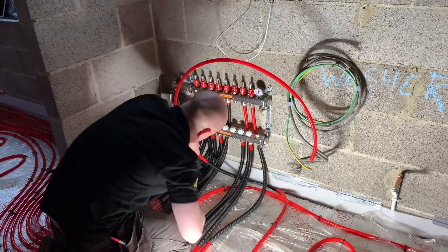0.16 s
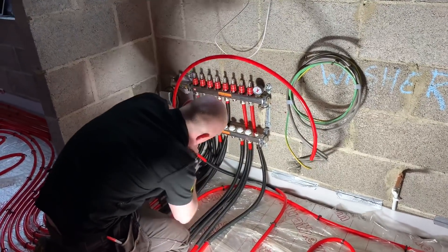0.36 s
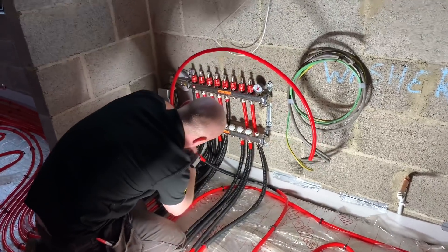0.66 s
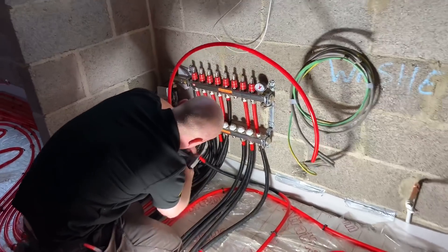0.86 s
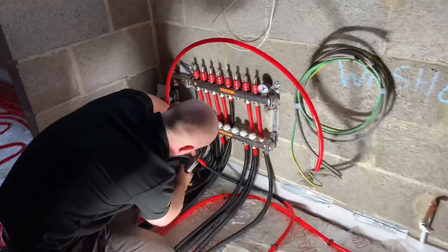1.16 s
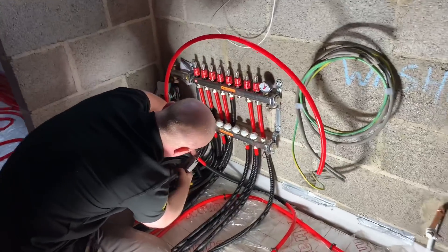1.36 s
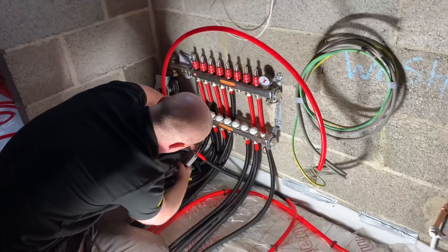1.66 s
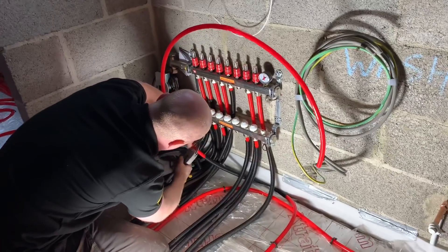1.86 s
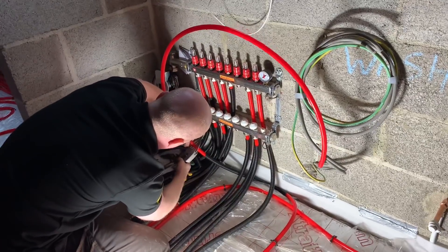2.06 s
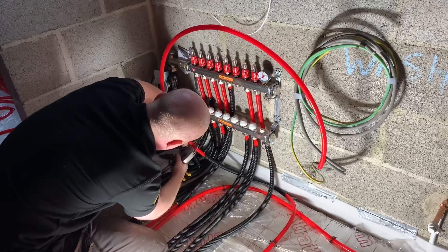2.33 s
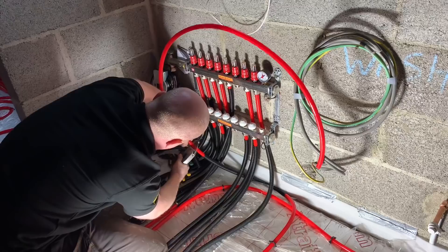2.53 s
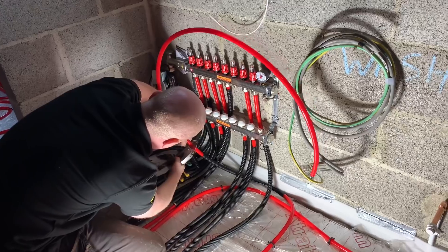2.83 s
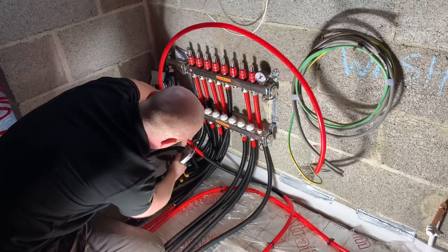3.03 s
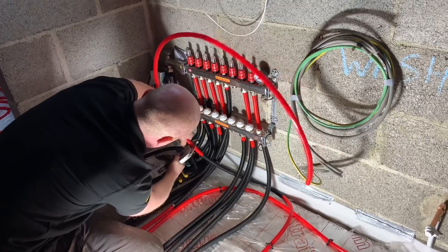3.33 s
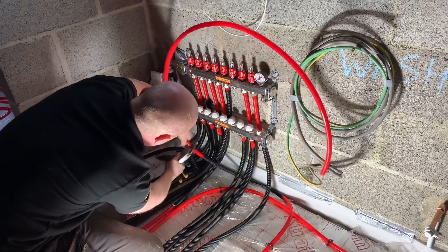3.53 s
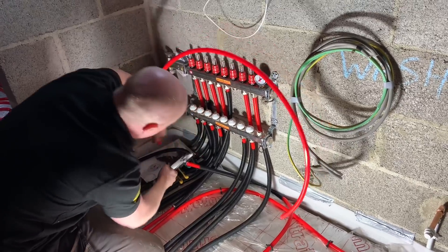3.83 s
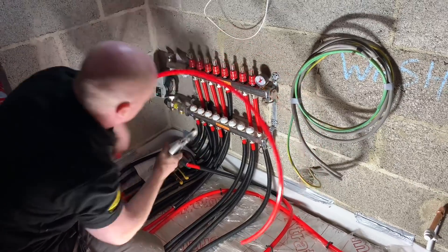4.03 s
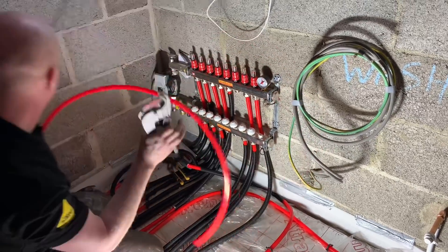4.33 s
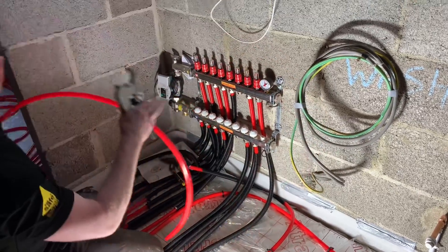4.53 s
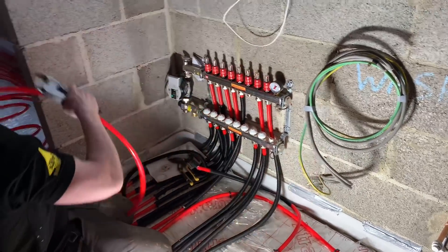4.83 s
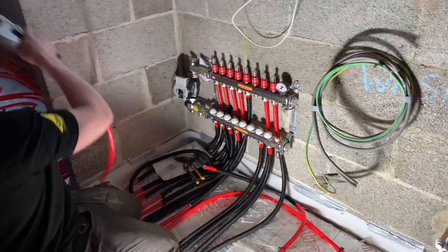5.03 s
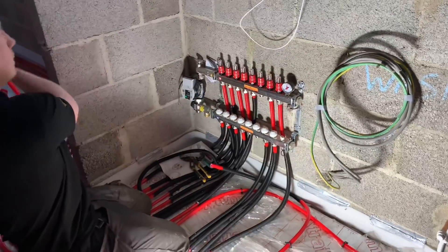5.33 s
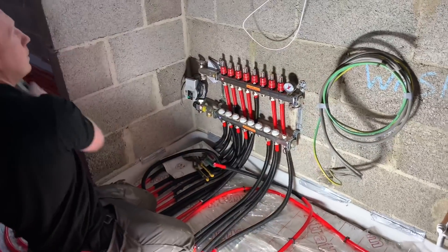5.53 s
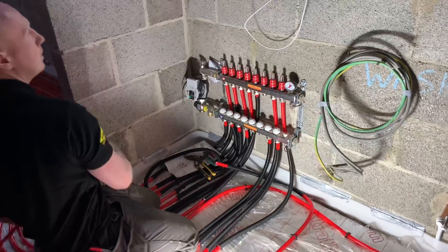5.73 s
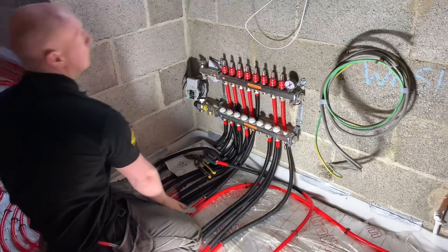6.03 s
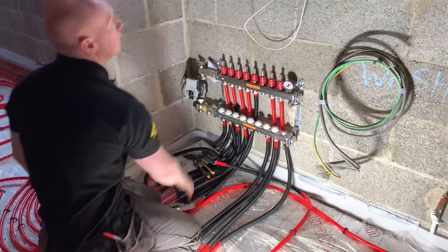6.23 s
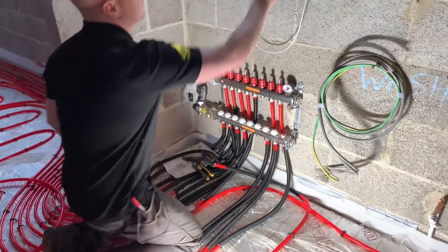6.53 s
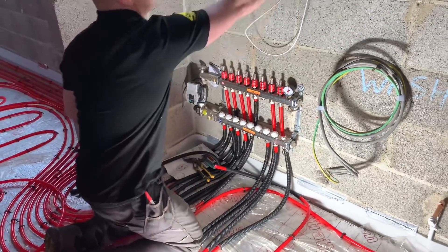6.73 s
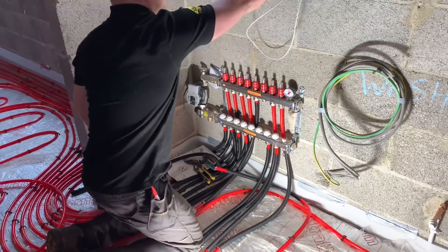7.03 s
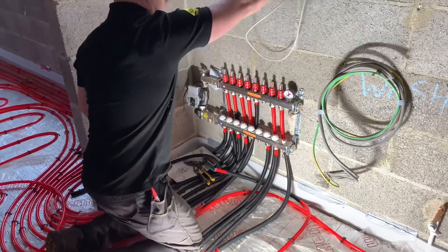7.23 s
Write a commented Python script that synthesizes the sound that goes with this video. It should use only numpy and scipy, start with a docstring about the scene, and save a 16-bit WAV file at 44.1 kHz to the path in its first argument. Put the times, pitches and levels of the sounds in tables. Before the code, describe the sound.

A ratchet cutter clicks and creaks through plastic heating pipe, which snaps and slaps; then heavy floor thumps, tool clatter and clothes rustling in a bare room.

```python
"""Bare block-walled room: a ratchet cutter bites through plastic heating pipe.
Cutter, pipe, floor and bumps: shaped contact noise plus decaying modes. Squeaks and creaks: harmonics of
stick-slip cycles. Crunches: noise bursts in wall resonances. Slaps and landings add booms of decaying sines.
The pipe snaps off and slaps about, the cutter clatters down, a knee thumps on the insulated floor.
Clothes and pipe rustle as filtered noise over the quiet noise of the empty building."""
import sys
import numpy as np
from scipy import signal
from scipy.fft import rfft, irfft, next_fast_len
from scipy.io import wavfile
from scipy.ndimage import uniform_filter1d

SR = 44100
rng = np.random.default_rng(int(sys.argv[2]) if len(sys.argv) > 2 else 0)


def unload_audio(sound):
    """Save the sound as a 16-bit wav file, at the path given as the first command line argument."""
    columns = np.transpose(np.atleast_2d(sound))
    # keep every value between -1 and 1, then stretch to whole-number steps
    steps = np.round(np.clip(columns, -1, 1) * 32767)
    wavfile.write(sys.argv[1], SR, steps.astype(np.int16))


N = 325899
RING_S = np.arange(next_fast_len(int(0.46 * SR))) / SR  # time axis of one event
BASS_HZ, TREBLE_HZ, TOP_HZ = 450, 6000, 15900  # band edges of a blow; TOP_HZ also ends the whole sound

# Event levels are ahead of layer gain and microphone.
# cutter squeezes, a creak ending in a click; the first meets no load, the last breaks through the pipe:
# click t/s, click level/dB, treble re click/dB, creak length/s, creak level/dB, creak start f/Hz, roughness 0-1
STROKES = [(0.11, -41, 11.5, .012, -59, 850, 0.5), (1.257, -29, 17, 0.052, -46.5, 944, 0.5),
           (1.606, -31.5, 7, 0.057, -37.5, 1860, 0.09), (2.015, -42.5, 5.5, 0.078, -49.5, 845, 0.47),
           (2.705, -35.5, 9, 0.084, -44.5, 670, 0.9), (3.111, -24.5, 16.5, .069, -41.5, 817, 0.8),
           (3.394, -25.5, 0, 0.017, -53, 900, 0.66), (3.454, -21, 4, 0.012, -33, 970, 0.75)]
PAWL_BASS_DB = -15  # re click
CREAK_RISE = 0.078  # share by which pitch climbs as the load builds
# handles and latch knocking as the grip eases: t/s, level/dB
HANDLE_CLICKS = [(1.378, -33.5), (1.667, -34), (2.105, -37), (2.161, -36), (2.756, -33), (2.921, -41.5),
                 (3.598, -33.5), (6.697, -47)]
# lighter clicks sound thinner: treble equals level at EVEN, gains THINNING dB per dB below it
HANDLE_BASS_DB, HANDLE_EVEN_DB, HANDLE_THINNING = -7.5, -37.5, 0.24
# cutter striking the floor and bouncing: t/s, level/dB, bass re level/dB, treble re level/dB
CUTTER_DROPS = [(6.007, -19, -6.5, -6), (6.113, -26, -3, -25)]
# cutter resonances: f/Hz, level/dB, t60/s
CUTTER_MODES = [(3143, -1, 0.03), (3492, 0, 0.072), (3750, 4, 0.06), (5690, -8, .08), (6218, -3, 0.06),
                (9620, 4, 0.13), (9790, 0, 0.08), (12800, -4, .06), (14290, -2, 0.06)]
# cutter contact noise: f/Hz, level/dB
CUTTER_CRACK = [(60, -6.5), (170, 1.5), (450, -5), (1200, -2), (3300, 2), (4800, -2), (7500, -8),
                (8600, 4.5), (9600, 8), (11000, -3.5), (14300, 2.5), (16000, -11.5)]

# plastic sticking and slipping: t/s, length/s, start f/Hz, end f/Hz, level/dB, roughness 0-1
SQUEAKS = [(1.05, 0.038, 3650, 2950, -47, 0.18), (1.563, .036, 3000, 3130, -38.5, .1),
           (3.655, 0.044, 1890, 2020, -35.5, 0.1), (6.86, 0.052, 6470, 6430, -46, 0),
           (6.995, 0.05, 5650, 5550, -51, .03)]
# pipe wall weighting of squeak harmonics: f/Hz, level/dB
SQUEAK_BODY = [(600, -30), (1100, -22), (1900, -2), (3000, 0), (3900, 1), (4700, -14), (6000, -17),
               (16000, -34)]
# pipe wall crunching under blade and grip: peak t/s, swell/s, level/dB, resonance f/Hz
CRUNCHES = [(1.264, 0.0056, -29.5, 3800), (1.61, .006, -34, 3200), (2.016, .006, -38, 3290),
            (2.11, 0.0084, -41.5, 3500), (2.501, .008, -47, 3970), (2.668, 0.022, -44.5, 1950),
            (2.709, 0.0098, -31.5, 3130), (3.059, 0.013, -42, 2520)]
# pipe wall resonances: multiple of the main one, relative width, level/dB
WALL_RESONANCES = [(1, .09, 0), (1.15, .1, -5), (1.65, .25, -12)]
CRUNCH_RELEASE_S = 0.0082

# loose pipe knocking on hard things: t/s, level/dB, contact hardness 0-1
PIPE_KNOCKS = [(2.85, -48.5, 0.05), (4.652, -40, 0.82), (4.692, -33.5, 0.76), (5.208, -50, 0.16),
               (7.289, -49, 0.59)]
# softest and hardest contact: bass re level/dB, treble re level/dB
SOFT_TONE, HARD_TONE = (5.5, -30), (-53, 0.5)
# pipe whipping free and slapping down, each with a boom and one rebound:
# t/s, level/dB, bass re level/dB, boom level/dB, boom f/Hz, boom loss on rebound/dB
PIPE_SLAPS = [(3.455, -15.5, -12, -17, 137.7, 10.5), (4.176, -29, 1, -13.5, 344.6, 5)]
SLAP_SOFTENING = 2.4  # dB lost by the rebound's crack per dB lost by its boom
SLAP_TREBLE_DB, SLAP_REBOUND_BASS_DB, SLAP_REBOUND_S = -9, 6.5, 0.081  # dB re the blow concerned
# pipe resonances: f/Hz, level/dB, t60/s
PIPE_MODES = [(317, -8, 0.041), (468.3, -8, 0.078), (875, -10.5, 0.083), (1047, -1.5, 0.037),
              (1310, 0, 0.028), (1884, 8.5, 0.028), (2324, -1.5, 0.03), (4160, -7.5, 0.066)]
# pipe contact noise: f/Hz, level/dB
PIPE_CRACK = [(50, -10), (170, 3), (330, 3), (650, -7), (1100, -3), (1900, 1), (5000, -7), (16000, -11)]

# knees, tool and fittings landing on the floor: touch, full weight with boom, rebound:
# t/s, level/dB, bass re level/dB, treble re level/dB, touch level/dB, boom level/dB, rebound delay/s
LANDINGS = [(5.732, -18, -9, -26, -28, -31.5, .029), (5.990, -17.5, -7.5, -15.5, -26.5, -9.5, .059),
            (6.145, -23.5, -9, -6, -27, -11, .029)]
TOUCH_LEAD_S, TOUCH_BASS_DB, TOUCH_TREBLE_DB = 0.035, -3, -22  # dB re touch
REBOUND_DB, REBOUND_TREBLE_DB, REBOUND_BOOM_DB = -7, -19, -4.5  # re landing, re rebound, re first boom
# resonances of what lands: f/Hz, level/dB, t60/s
CLATTER_MODES = [(322, 5, 0.213), (462, 3.5, 0.39), (593, 15.5, 0.064), (683, 7, 0.28), (1104, 19.5, 0.04),
                 (1716, 6, 0.1), (2267, 5, 0.073)]
# landing contact noise: f/Hz, level/dB
CLATTER_CRACK = [(60, -16), (180, -30), (350, 0), (700, 0), (1500, -2), (3500, -5), (5500, -21),
                 (10000, -5), (16000, -4.5)]
# boom resonances: multiple of boom pitch, level/dB, t60 at 170 Hz pitch/s
BOOM_MODES = [(.68, -23.5, 0.24), (1, -9, 0.17), (.97, 2, 0.05), (1.3, -5, 0.041)]
BOOM_LAG_S = 0.0032  # a boom builds just after its blow
FLOOR_HZ = 167.2  # boom of the insulation panels
# whole floor, level ahead of the high-pass for a boom at FLOOR_HZ
RUMBLE_HZ, RUMBLE_DB, RUMBLE_T60_S = 61, -19.5, 0.67

# dull bumps of hands, boots and pipe on the floor: t/s, level/dB, bass re level/dB
BUMPS = [(0.391, -59, 5), (0.69, -53, 8), (0.87, -53.5, 5.5), (1.094, -45.5, 1.5), (1.421, -37.5, 2),
         (2.496, -45, -3.5), (3.25, -46, 3), (5.038, -54, 0.5), (5.078, -60.5, 11.5), (6.623, -34.5, 1),
         (6.651, -42.5, 5), (6.82, -52, -14.5)]
BUMP_TREBLE_DB = -25.5  # re level
# bump resonances: f/Hz, level/dB, t60/s
BUMP_MODES = [(158, 0.5, 0.1), (330, -5.5, 0.094), (523, -3.5, .05), (1000, -5.5, 0.052)]
# bump contact noise: f/Hz, level/dB
BUMP_CRACK = [(60, -1.5), (170, 4.5), (900, -1), (1500, -4.5), (2500, -13.5), (8000, -35.5)]

# sleeves, trousers and pipe rubbing, one curve per movement: t/s, rub level/dB, hiss level/dB
RUB_AT_REST = (0, -55.5, -61.5)  # ahead of the first movement
# reaching: t/s, rub level/dB, hiss level/dB
RUB_REACHING = [(0.18, -50, -49.5), (0.328, -53, -41.5), (0.466, -62.5, -64), (0.622, -66, -72),
                (0.648, -54.5, -63), (0.684, -60.5, -53), (1.04, -60.5, -60)]
# cutting: t/s, rub level/dB, hiss level/dB
RUB_CUTTING = [(1.15, -59.5, -66.5), (1.28, -53, -37), (1.46, -43.5, -40), (1.54, -52, -52.5),
               (1.73, -108, -72), (1.98, -51, -80), (2.12, -54, -67), (2.28, -93.5, -68.5),
               (2.54, -63.5, -78), (2.74, -51.5, -55.5), (3.35, -64, -61)]
# turning: t/s, rub level/dB, hiss level/dB
RUB_TURNING = [(3.75, -60.5, -79), (4.058, -58, -67), (4.7, -59, -52)]
# rising: t/s, rub level/dB, hiss level/dB
RUB_RISING = [(4.8, -59.5, -53.5), (4.884, -51, -57), (4.976, -66, -92), (5.052, -61, -74),
              (5.079, -52.5, -58), (5.574, -50.5, -62.5), (5.64, -59.5, -70)]
# kneeling: t/s, rub level/dB, hiss level/dB
RUB_KNEELING = [(5.68, -59.5, -63), (5.774, -30.5, -46.5), (5.888, -40.5, -57), (5.936, -46.5, -62),
                (6.018, -21, -56), (6.1, -35, -50), (6.146, -25, -41), (6.298, -42, -61), (6.418, -48, -72),
                (6.642, -63.5, -65.5), (6.888, -50, -52.5), (7.39, -65, -62)]
RUB_FLICKER_DB = 2
# rustle noise colour: f/Hz, level/dB
RUSTLE_COLOUR = [(60, 13), (170, 4), (500, 0.5), (1000, 5.5), (2800, -3), (5000, -17.5), (15000, -25)]

# empty building, noise colour: f/Hz, level per Hz/dB
AMBIENCE = [(20, -7.5), (60, 5), (100, -5.5), (320, -7), (600, -18.5), (1200, -26.5), (3000, -21.5),
            (5000, -36), (10000, -39), (16000, -39)]
AMBIENCE_DB = -55.5
# room decay: f/Hz, t60/s
ROOM_T60 = [(60, 0.56), (160, 0.42), (420, 0.23), (1100, 0.27), (3000, 0.21), (8000, 0.16), (15000, 0.094)]
# likeness of left and right: f/Hz, correlation
LIKENESS = [(30, .2), (90, .88), (180, .8), (350, .3), (700, -.3), (1400, -.2), (2800, .05), (4500, -.2),
            (6500, .4), (9600, .6), (14000, .2)]
# microphone balance: f/Hz, left minus right/dB
MIC_BALANCE = [(80, -3.5), (170, -1), (330, -1), (650, 4.5), (1300, 2), (2600, 0.5), (5500, -1.5),
               (10000, 0.5)]
# microphone response: f/Hz, level/dB
MIC_COLOUR = [(10500, 1.5), (11300, -10.5), (11750, -25.5), (12300, 2.5), (13000, 1)]


def cutter():
    """Pawl ends every squeeze, handles knock in between, the tool drops: metal modes and contact noise."""
    pawl = [(t_s, db, PAWL_BASS_DB, treble_db) for t_s, db, treble_db, *_ in STROKES]
    handles = [(t_s, db, HANDLE_BASS_DB, HANDLE_THINNING * (HANDLE_EVEN_DB - db))
               for t_s, db in HANDLE_CLICKS]
    return blows(pawl + CUTTER_DROPS + handles, CUTTER_MODES, CUTTER_CRACK,
                 contact_s=0.0029, ring_db=-11.5, wet_db=1.2, bass_from_hz=180,
                 loud_db=-22.0, force_slope=0.88, rattle_db=-28.5, rattle_t60_s=0.05)


def creaks():
    """Each squeeze creaks upward until the pawl clicks; rows as in SQUEAKS."""
    return [(t_s - length_s, length_s, hz, hz * (1 + CREAK_RISE), db, rough)
            for t_s, _, _, length_s, db, hz, rough in STROKES]


def squeaks(jitter=0.24, wet_db=-4, catch_db=2.8):
    """Stick-slip cycles through pipe wall resonances; uneven slips turn a squeak into a creak."""
    dry = np.zeros(N)
    for t_s, length_s, start_hz, end_hz, db, rough in creaks() + SQUEAKS:
        u = np.linspace(0, 1, int(length_s * SR))
        wobble, grip = (unit(uniform_filter1d(rng.standard_normal(len(u)), size=size))
                        for size in (60, 200))
        pitch_hz = (start_hz + (end_hz - start_hz) * u) * (1 + jitter * rough * wobble)
        phase = 2 * np.pi * np.cumsum(pitch_hz) / SR
        harmonics = range(1, max(int(12000 / start_hz), 1) + 1)
        slips = sum(undb(at(SQUEAK_BODY, k * start_hz)) * np.sin(k * phase) for k in harmonics)
        swell = u * np.sqrt(1 - u)
        catches = undb(catch_db * (1.5 + rough) * grip)
        add(dry, t_s, undb(db) * unit(slips * swell * catches))
    return room(dry, wet_db)


def crunches(grain_db=6, wet_db=-3):
    """A burst of tiny slips swells and dies away in the resonances of the pipe wall."""
    dry = np.zeros(N)
    for t_s, swell_s, db, hz in CRUNCHES:
        u_s = RING_S - 2 * swell_s
        effort = np.where(u_s < 0, np.exp(-(u_s / swell_s) ** 2), np.exp(-np.abs(u_s) / CRUNCH_RELEASE_S))
        slips = effort * rng.standard_normal(len(RING_S)) * undb(grain_db * walk(600)[:len(RING_S)])
        wall = sum(undb(mode_db) * band(slips, hz * k * (1 - width / 2), hz * k * (1 + width / 2), order=1)
                   for k, width, mode_db in WALL_RESONANCES)
        wall = band(wall, hz / 2, hz * 2, order=2)
        # level as rms over 30 ms
        add(dry, t_s - 2 * swell_s, undb(db) * wall / np.sqrt(np.sum(wall ** 2) / (0.03 * SR)))
    return room(dry, wet_db)


def pipe():
    """Pipe wall modes: harder knocks trade bass for treble; a slap comes back once, softer and duller."""
    rows = []
    for t_s, db, hard in PIPE_KNOCKS:
        bass_db, treble_db = np.array(SOFT_TONE) * (1 - hard) + np.array(HARD_TONE) * hard
        rows.append((t_s, db, bass_db, treble_db))
    for t_s, db, bass_db, _, _, loss_db in PIPE_SLAPS:
        rebound_db = db - SLAP_SOFTENING * loss_db
        rows += [(t_s, db, bass_db, SLAP_TREBLE_DB),
                 (t_s + SLAP_REBOUND_S, rebound_db, SLAP_REBOUND_BASS_DB, SLAP_TREBLE_DB)]
    return blows(rows, PIPE_MODES, PIPE_CRACK,
                 contact_s=0.0091, ring_db=-4.0, wet_db=-3.0, bass_from_hz=110,
                 loud_db=-17.5, force_slope=0.033, rattle_db=-4.5, rattle_t60_s=0.099)


def landings():
    """Every landing touches, bears down and rebounds, each a rattling blow with its own modes."""
    rows = []
    for t_s, db, bass_db, treble_db, touch_db, _, rebound_s in LANDINGS:
        rows += [(t_s - TOUCH_LEAD_S, touch_db, TOUCH_BASS_DB, TOUCH_TREBLE_DB),
                 (t_s, db, bass_db, treble_db),
                 (t_s + rebound_s, db + REBOUND_DB, bass_db, REBOUND_TREBLE_DB)]
    return blows(rows, CLATTER_MODES, CLATTER_CRACK,
                 contact_s=0.0085, ring_db=-6.5, wet_db=-2.5, bass_from_hz=146,
                 loud_db=-12, force_slope=0.31, rattle_db=-10.0, rattle_t60_s=0.16)


def booms():
    """Slaps and landings boom, and again as they rebound; rows of t/s, level/dB, f/Hz."""
    heavy = [(t_s, db, hz, SLAP_REBOUND_S, -loss_db) for t_s, _, _, db, hz, loss_db in PIPE_SLAPS]
    heavy += [(t_s, db, FLOOR_HZ, rebound_s, REBOUND_BOOM_DB) for t_s, *_, db, rebound_s in LANDINGS]
    rows = []
    for t_s, db, hz, rebound_s, rebound_db in heavy:
        start_s = t_s + BOOM_LAG_S
        rows += [(start_s, db, hz), (start_s + rebound_s, db + rebound_db, hz)]
    return rows


def thumps(push_s=0.00083, wet_db=-10):
    """A soft push makes a panel or the pipe boom at its own pitch; the whole floor answers low booms most."""
    dry = np.zeros(N)
    for t_s, db, hz in booms():
        # higher booms die sooner
        boom = sum(undb(mode_db) * fade(t60_s * 170 / hz) * np.sin(2 * np.pi * multiple * hz * RING_S)
                   for multiple, mode_db, t60_s in BOOM_MODES)
        rumble = fade(RUMBLE_T60_S) * np.sin(2 * np.pi * RUMBLE_HZ * RING_S)
        boom += undb(RUMBLE_DB) * (FLOOR_HZ / hz) ** 2 * rumble
        add(dry, t_s, undb(db) * boom * (1 - np.exp(-RING_S / push_s)))
    return room(band(dry, 68, 2200, order=3), wet_db)


def bumps():
    """Hands, boots and pipe on the floor: short dull contacts with low modes."""
    return blows([(*row, BUMP_TREBLE_DB) for row in BUMPS], BUMP_MODES, BUMP_CRACK,
                 contact_s=0.0018, ring_db=-4, wet_db=-3.5, bass_from_hz=85,
                 loud_db=-32, force_slope=0.05, rattle_db=-18.5, rattle_t60_s=0.08)


def rustle(rub_gain_db=1, hiss_gain_db=-1.0, grain_db=2, shuffle_db=-3):
    """Rubbing swells and fades as noise with a fast grain of small catches, cloth hiss on top."""
    curve = [RUB_AT_REST, *RUB_REACHING, *RUB_CUTTING, *RUB_TURNING, *RUB_RISING, *RUB_KNEELING]
    point_s, rub_db, hiss_db = np.transpose(curve)
    t_s = np.arange(N) / SR
    rub = undb(np.interp(t_s, point_s, rub_db) + rub_gain_db)
    hiss = undb(np.interp(t_s, point_s, hiss_db) + hiss_gain_db)
    flicker = undb(grain_db * walk(350) + RUB_FLICKER_DB * walk(25))
    noise = colour(diffuse(N), RUSTLE_COLOUR) * flicker
    shuffle = undb(shuffle_db + 5.3 * walk(22)) * unit(band(noise, 110, 630))
    return rub * (shuffle + unit(band(noise, 430, 4050))) + hiss * unit(band(noise, 4000, TOP_HZ))


def ambience():
    """Quiet rumble and hiss of the empty building: coloured noise at a slowly drifting level."""
    return unit(colour(diffuse(N), AMBIENCE)) * undb(AMBIENCE_DB + 0.46 * walk(3))


def blows(events, modes, crack, contact_s, ring_db, wet_db, bass_from_hz, loud_db, force_slope,
          rattle_db, rattle_t60_s):
    """Each blow chatters for a few ms and rings the modes; its weight and hardness set bass and treble."""
    out, attack = np.zeros((2, N)), int(0.03 * SR)
    for t_s, db, bass_db, treble_db in events:
        # a harder blow chatters for longer and rings more
        force = undb(force_slope * (db - loud_db))
        u = RING_S / (contact_s * force)
        # loose parts rattle on in small uneven bounces
        bounces = unit(uniform_filter1d(rng.exponential(size=len(RING_S)) ** 6, size=70))
        push = np.sqrt(u) * np.exp(-u ** 2) + undb(rattle_db) * bounces * fade(rattle_t60_s)
        contact = colour(rng.standard_normal(len(RING_S)), crack) * push
        # mode levels and pitches vary a little at random from blow to blow
        ring = 0
        for hz, mode_db, t60_s in modes:
            gain = undb(mode_db + 2 * rng.normal())
            mode_hz = hz * (1 + 0.0052 * rng.normal())
            ring = ring + gain * fade(t60_s) * np.sin(2 * np.pi * mode_hz * RING_S) * rng.choice([-1, 1])
        sound = room(unit(contact) + force * undb(ring_db) * unit(ring), wet_db)
        bands = ((bass_from_hz, BASS_HZ, bass_db), (BASS_HZ, TREBLE_HZ, 0), (TREBLE_HZ, TOP_HZ, treble_db))
        for lo_hz, hi_hz, tone_db in bands:
            part = band(sound, lo_hz, hi_hz)
            # level as rms over the attack
            add(out, t_s, part * undb(db + tone_db) / np.sqrt(np.mean(part[:, :attack] ** 2)))
    return out


def room(x, wet_db, near_t60_s=0.0017):
    """Direct sound with the nearest reflections, then a diffuse tail in which the lows stay longest."""
    near = diffuse(len(RING_S)) * fade(near_t60_s)
    near = band(near, 440, 30000, order=1) / np.sqrt(np.sum(near ** 2) / 2)
    impulse = 1. * (RING_S == 0)
    near += band(impulse, 22, 480, order=1)
    noise = diffuse(len(RING_S))
    spectrum, noise_hz = rfft(noise), bins(noise)
    centres_hz = [hz for hz, _ in ROOM_T60]
    tail = 0
    for share, (_, t60_s) in zip(np.eye(len(centres_hz)), ROOM_T60):
        weight = at(list(zip(centres_hz, share)), noise_hz)
        tail = tail + irfft(spectrum * weight, len(RING_S)) * fade(t60_s)
    tail *= 1 - np.exp(-RING_S / 0.0022)
    response = near + undb(wet_db) * tail / np.sqrt(np.sum(tail ** 2) / 2)
    return signal.fftconvolve(x[None], response, axes=1)[:, :len(x)]


def diffuse(size):
    """Stereo noise as two microphone ports hear a room, correlated by LIKENESS."""
    noise = rng.standard_normal((2, next_fast_len(size)))
    like = np.clip(at(LIKENESS, bins(noise)), -0.99, 0.99)
    mid, side = rfft(noise) * np.sqrt([1 + like, 1 - like])
    return irfft([mid + side, mid - side], noise.shape[-1])[:, :size] / np.sqrt(2)


def walk(rate_hz):
    """Random drift with unit rms over the whole scene, rate_hz new values a second."""
    k = int(SR / rate_hz)
    steps = np.repeat(rng.standard_normal(N // k + 1), k)
    return unit(uniform_filter1d(steps, k)[:N])


def fade(t60_s):
    """Exponential decay, 60 dB down after t60_s."""
    return np.exp(-np.log(1000) * RING_S / max(t60_s, 1e-4))


def band(x, lo_hz, hi_hz, order=4):
    """Butterworth band-pass."""
    edges_hz = [lo_hz, min(hi_hz, SR / 2 - 1)]
    return signal.sosfilt(signal.butter(order, edges_hz, "band", fs=SR, output="sos"), x)


def colour(x, points):
    """Filter by a curve of f/Hz, level/dB."""
    size = next_fast_len(x.shape[-1])
    gain = undb(at(points, np.fft.rfftfreq(size, 1 / SR)))
    return irfft(rfft(x, size) * gain, size)[..., :x.shape[-1]]


def at(points, hz):
    """Read points of f/Hz, value on a log-frequency axis."""
    f_hz, value = np.transpose(points)
    return np.interp(np.log(np.maximum(hz, 1)), np.log(f_hz), value)


def bins(x):
    """Frequency of each spectral bin of x in Hz."""
    return np.fft.rfftfreq(x.shape[-1], 1 / SR)


def undb(db):
    """Decibels to gain."""
    return 10 ** (np.asarray(db) / 20)


def unit(x):
    """Scale to rms 1."""
    return x / np.sqrt(np.mean(x ** 2) + 1e-20)


def add(out, t_s, x):
    """Mix x into out from t_s."""
    i = max(int(t_s * SR), 0)
    out[..., i:i + x.shape[-1]] += x[..., :N - i]


def scene():
    """Cutter, pipe, floor and clothes in one room."""
    mix = undb(-4.0) * cutter() + undb(2.37) * pipe() + undb(-1.3) * landings() + bumps()
    return mix + thumps() + squeaks() + crunches() + rustle() + ambience()


def record(dry):
    """Small microphone with a treble notch; peaks past full scale clip, then a steep low-pass."""
    sides = np.array([colour(x, [(hz, sign * db / 2) for hz, db in MIC_BALANCE])
                      for x, sign in zip(dry, (1, -1))])
    heard = np.clip(colour(sides, MIC_COLOUR), -1, 1)
    return signal.sosfilt(signal.ellip(8, 0.2, 70, TOP_HZ, fs=SR, output="sos"), heard)


dry = scene()
out = record(dry)
unload_audio(out)
```